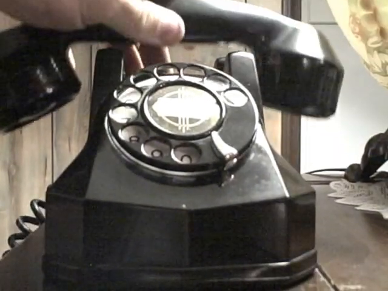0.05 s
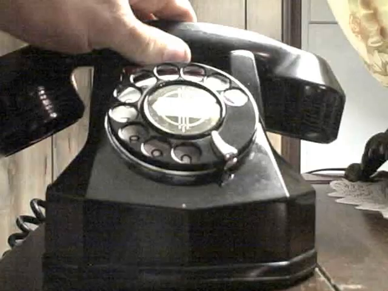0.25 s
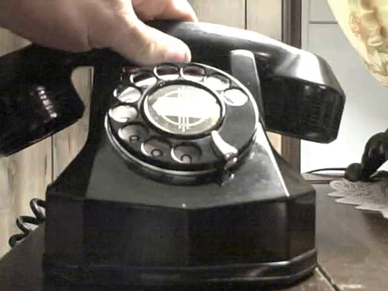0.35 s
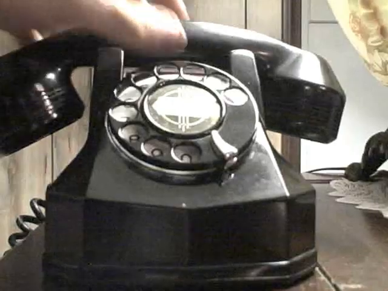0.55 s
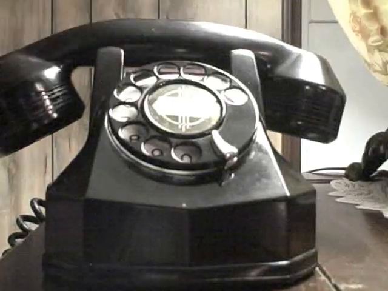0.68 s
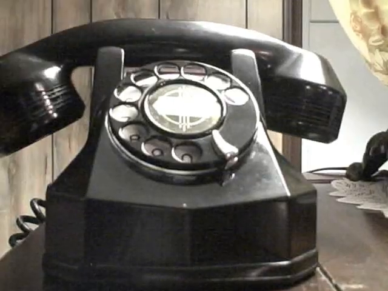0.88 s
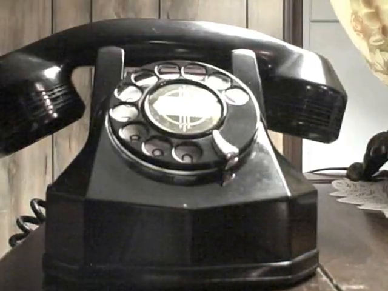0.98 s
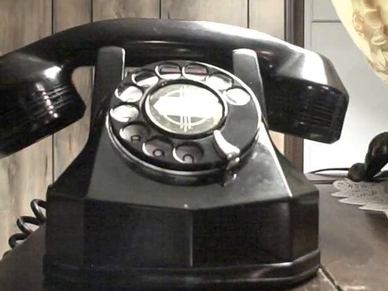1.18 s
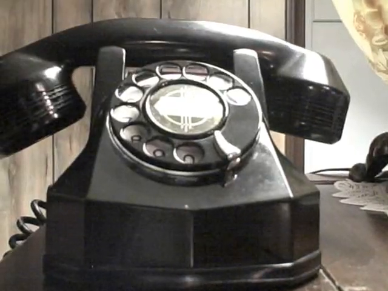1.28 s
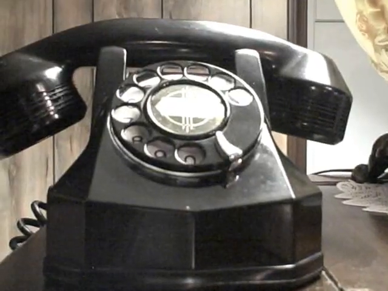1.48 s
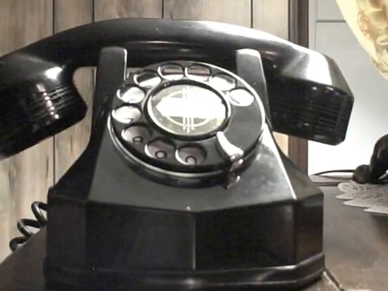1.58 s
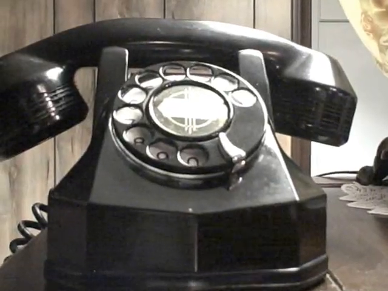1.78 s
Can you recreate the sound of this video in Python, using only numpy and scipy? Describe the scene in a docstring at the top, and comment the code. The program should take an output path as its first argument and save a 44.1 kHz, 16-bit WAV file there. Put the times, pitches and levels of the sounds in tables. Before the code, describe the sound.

A heavy plastic handset lands on a desk telephone, one end then the other, with a low desk thump and short rattle; then soft taps, thin ticks and cloth rustle in a quiet, hissy room, close microphone.

```python
"""A heavy plastic handset lands on a desk telephone: one end clacks, then the other, and it rocks to rest.
Each contact is a noise crack plus dying modes of shell, base and hollow; the desk booms, loose parts chatter.
Soft taps, thin ticks and cloth rustle (shaped noise) are heard in a quiet room with a noise-tail echo.
The camera adds rumble, hiss and two thin whines, and samples at a low rate that mirrors the treble."""
import sys
import numpy as np
from scipy import signal
from scipy.fft import rfft, irfft
from scipy.io import wavfile
from scipy.ndimage import uniform_filter1d

SR = 44100
rng = np.random.default_rng(int(sys.argv[2]) if len(sys.argv) > 2 else 0)


def output_pcm(signal):
    """Save a mono or channel-first signal as 16-bit PCM at the path in sys.argv[1].

    Samples are clipped to [-1, 1] before scaling.
    """
    pcm = np.clip(np.atleast_2d(signal).T, -1, 1) * 32767
    wavfile.write(sys.argv[1], SR, np.round(pcm).astype(np.int16))


def volts_from_db(level):
    """Convert decibel levels to linear amplitude ratios."""
    exponent = np.asarray(level, float) / 20
    return 10 ** exponent


N = 81585  # samples


def evened(x):
    """Normalisation by mean power: scales to rms 1."""
    return x / np.sqrt(np.mean(x ** 2) + 1e-20)


def read_spectrum(points, hz):
    """Interpolation on a log-frequency axis, which follows pitch, of a table over Hz."""
    f, value = np.transpose(points)
    return np.interp(np.log(hz + 1), np.log(f + 1), value)


def coloured(x, points):
    """Linear filtering: multiplies the spectrum of x by a table of dB over Hz."""
    gain = volts_from_db(read_spectrum(points, np.fft.rfftfreq(len(x), 1 / SR)))
    return irfft(rfft(x) * gain, len(x))


def level(curve):
    """Amplitude envelope: gain over time from straight lines in dB."""
    s, db = np.transpose(curve)
    return volts_from_db(np.interp(np.arange(N) / SR, s, db))


def add(mix, s, sound):
    """Superposition: adds a sound to the mix at time s."""
    part = mix[round(s * SR):][:len(sound)]
    part += sound[:len(part)]


def hiss(colour, lump_db, lump_s):
    """Amplitude-modulated noise: coloured noise whose level wanders by lump_db rms."""
    lumps = evened(uniform_filter1d(rng.standard_normal(N), max(round(lump_s * SR), 1)))
    noise = evened(coloured(rng.standard_normal(N), colour))
    return evened(noise * volts_from_db(lump_db * lumps))


def burst(colour, t60):
    """Exponential decay: a short dying puff of coloured noise."""
    t = np.arange(SR // 2) / SR
    return evened(coloured(rng.standard_normal(len(t)), colour)) * volts_from_db(-60 * t / t60)


# each contact point favours other modes (dB) and loads them a little (share of frequency)
SPOT_DB, SPOT_DETUNE = 2.5, 0.02
# heavy parts take longer to get moving
SHELL_RISE_S, BASE_RISE_S, DESK_RISE_S = 0.00015, 0.00047, 0.012


def ring(modes, rise_s, scatter=0):
    """Modal synthesis: a struck object sounds as the sum of its dying sines, one per mode."""
    hz, db, t60 = np.transpose(modes)[:, :, None]
    t = np.arange(SR // 2) / SR
    favour, load, coin = rng.standard_normal((3,) + hz.shape)
    # neighbours start opposed; scatter shifts a random half of them, 1 being half a turn
    start_turns = (scatter * (coin > 0) + np.arange(len(hz))[:, None]) / 2
    turns = hz * (1 + SPOT_DETUNE * load) * t + start_turns
    waves = volts_from_db(db + SPOT_DB * favour - 60 * t / t60) * np.sin(2 * np.pi * turns)
    return (1 - np.exp(-t / rise_s)) * waves.sum(0) / np.linalg.norm(volts_from_db(db))


# Cloth rustle over time. Each row: time in seconds, level in dB.
RUSTLE_LEVEL = [(0, -97.5), (.54, -82.5), (.575, -54.5), (.61, -86), (1.08, -70.5), (1.17, -58),
                (1.225, -64), (1.255, -53.5), (1.33, -57), (1.4, -68.5), (1.55, -73.5), (1.65, -67),
                (1.75, -63), (1.85, -57)]
# Rustle spectrum. Each row: frequency in Hz, relative density in dB.
RUSTLE_COLOUR = [(300, -23), (2000, -13.5), (4000, -13.5), (5200, -11.5), (6300, -0.5), (7900, -8.5)]


def rustle():
    """Friction noise: cloth heard as bright noise with quick lumps."""
    return level(RUSTLE_LEVEL) * hiss(RUSTLE_COLOUR, lump_db=2.3, lump_s=0.0078)


# Low stir in the room over time. Each row: time in seconds, level in dB.
STIR_LEVEL = [(0, -82), (.9, -75.5), (1.25, -67), (1.45, -73), (1.62, -64), (1.72, -71), (1.85, -68)]
# Stir spectrum. Each row: frequency in Hz, relative density in dB.
STIR_COLOUR = [(100, -11.5), (300, -2), (550, -7.5), (1100, -4), (1600, -16), (3000, -28)]


def stir():
    """Band-shaped noise: a dull stir in the room with slower lumps."""
    return level(STIR_LEVEL) * hiss(STIR_COLOUR, lump_db=2.5, lump_s=0.04)


# Room rumble and camera hiss. Each row: frequency in Hz, relative density in dB.
FLOOR_COLOUR = [(15, -17.5), (45, -2), (65, -7), (90, -15), (250, -21.5), (550, -25), (800, -37),
                (2000, -39.5), (4000, -40.5), (6300, -36.5), (7200, -33), (7900, -46.5)]
FLOOR_DB = -55


def noise_floor():
    """Stationary noise: steady rumble and hiss, plus a low rumble that wanders in level."""
    steady = volts_from_db(FLOOR_DB) * hiss(FLOOR_COLOUR, lump_db=0, lump_s=0.01)
    low_colour = FLOOR_COLOUR[:4] + [(200, -58)]
    return steady + volts_from_db(FLOOR_DB - 5.5) * hiss(low_colour, lump_db=-2, lump_s=0.06)


# Motor whine, in two stretches. Each row: time in seconds, frequency in Hz, rms level in dB.
MOTOR = [
    [(0.0, 2050, -66), (0.04, 2050, -68.5), (0.22, 2046, -64)],
    [(0.4, 2052, -64.5), (0.504, 2050, -70), (0.86, 2048, -66), (0.956, 2050, -76.5), (1.252, 2045, -69),
     (1.506, 2050, -79), (1.676, 2044, -71), (1.85, 2044, -70.5)],
]


def motor_whine():
    """Frequency modulation: the phase is the running sum of a wavering frequency."""
    t = np.arange(N) / SR
    s, hz, db = np.vstack(MOTOR).T
    turns = np.cumsum(np.interp(t, s, hz)) / SR
    return np.sqrt(2) * volts_from_db(np.interp(t, s, db)) * np.sin(2 * np.pi * turns)


SCAN_HZ, SCAN_DB = 7627, -66  # high tone between its dips
FRAME_HZ, FIRST_DIP_S, DIP_S = 58.35, 0.011, 0.0008
DIP_TURNS, DIP_DB = 0.5, 5  # phase lost in each dip, and the swell during it
BLUR_S, BLUR_TURNS = (1.625, 1.71), 0.4  # the high tone briefly turns fuzzy


def scan_whine():
    """Phase modulation: a high tone loses phase in each frame, so its pitch dips briefly."""
    t = np.arange(N) / SR
    frames = (t - FIRST_DIP_S) * FRAME_HZ
    dip_share = DIP_S * FRAME_HZ
    lost = DIP_TURNS * (np.floor(frames) + np.minimum(frames % 1 / dip_share, 1))
    jitter = evened(uniform_filter1d(rng.standard_normal(N), size=120))
    blur = (t > BLUR_S[0]) * (t < BLUR_S[1]) * jitter
    gain = np.sqrt(2) * volts_from_db(SCAN_DB + DIP_DB * (frames % 1 < dip_share))
    return gain * np.sin(2 * np.pi * (SCAN_HZ * t - lost + BLUR_TURNS * blur))


# Taps as the phone is brushed or settles. Each row: start in seconds, then knock, base and shell level in dB.
TAPS = [(0.1448, -49, -39.5, -72), (0.4724, -40.5, -43, -56.5), (0.4763, -64, -55, -61),
        (0.483, -48, -41.5, -63), (.5530, -51, -46, -67), (1.239, -53, -55, -65)]
# Modes of the knock. Each row: frequency in Hz, relative level in dB, t60 in seconds.
KNOCK_RING = [(380.6, -0.5, 0.08), (900, -1, .03), (599.7, -6, 0.013)]
# Noise of the knock. Each row: frequency in Hz, relative density in dB.
KNOCK_COLOUR = [(100, -13.5), (400, -0.5), (850, -5), (1200, -15), (3000, -19), (4500, -36), (8000, -52)]
# Modes of the phone's base. Each row: frequency in Hz, relative level in dB, t60 in seconds.
BASE = [(104.56, -8, .06), (161.6, -1.5, 0.081), (244, -8.5, .12), (310, -10.5, .05), (382.4, -9, .05),
        (431, -9, .055), (525, -3, .05), (1170, -9, .025), (1779, -2.5, 0.04)]
# Modes of the plastic shell. Each row: frequency in Hz, relative level in dB, t60 in seconds.
SHELL = [(813, -12, 0.03), (1152, -13.5, 0.039), (1555, -16.5, 0.032), (1750, -7, 0.028),
         (2674, -16.5, 0.17), (2800, -16, .15), (3173, -4, 0.025), (3947, -10.5, .02), (4560, -4.5, 0.024),
         (5090, -8, 0.018), (5812, 0.5, 0.018), (6290, -5, 0.031), (6960, -4.5, 0.018), (7330, 1.5, 0.019)]


def soft_taps():
    """Soft excitation: a gentle blow wakes only the lowest modes of base and shell."""
    out = np.zeros(N)
    for s, knock_db, base_db, shell_db in TAPS:
        knock = ring(KNOCK_RING, BASE_RISE_S) + volts_from_db(-5.5) * burst(KNOCK_COLOUR, t60=0.046)
        base = ring(BASE[:4], BASE_RISE_S)
        shell = ring(SHELL[:7], BASE_RISE_S, scatter=1)
        add(out, s, volts_from_db(knock_db) * knock + volts_from_db(base_db) * base + volts_from_db(shell_db) * shell)
    return out


# Decay of the room. Each row: frequency in Hz, t60 in seconds.
ROOM_T60 = [(100, 0.24), (500, 0.41), (1500, 0.23), (4000, 0.27), (7500, 0.2)]


def room(x):
    """Reverberation: convolution with a noise tail whose bands die at their own speeds."""
    hz, t, z = signal.stft(rng.standard_normal(SR // 2), SR, nperseg=256)
    decay = volts_from_db(-60 * t / read_spectrum(ROOM_T60, hz)[:, None])
    tail = signal.istft(z * decay, SR, nperseg=256)[1]
    tail *= np.minimum(np.arange(len(tail)) / SR / 0.01, 1)  # builds up over 10 ms
    return signal.fftconvolve(x, tail / np.linalg.norm(tail))[:N]


# The desk takes a load and booms. Each row: start in seconds, level in dB.
THUMPS = [(0.146, -38.5), (.2748, -38), (0.3195, -19.5), (0.555, -50), (1.252, -37)]
# Modes of the desk. Each row: frequency in Hz, relative level in dB, t60 in seconds.
DESK = [(48.5, -2, 0.3), (73.5, -13.5, .2), (30, -5.5, 0.22)]


def desk_thumps():
    """Inertia: the heavy desk answers a load with slow-rising low modes."""
    out = np.zeros(N)
    for s, db in THUMPS:
        add(out, s, volts_from_db(db) * ring(DESK, DESK_RISE_S))
    return out


# Contacts of handset and cradle. Each row: start in seconds, then shell, base and hollow level in dB.
CONTACTS = [(0.2372, -7.5, -41.5, -48), (0.2390, -10.5, -43.5, -47.5), (.2408, -6, -41.5, -46),
            (.2430, -14, -46, -51), (0.248, -25.5, -53, -58.5), (0.27, -19, -29.5, -39.5),
            (0.2721, -18.5, -29.5, -37.5), (0.2751, -10.5, -3.5, -26), (0.2774, -9.5, -14, -29.5),
            (0.281, -4.5, -14, -32), (0.2859, -12.5, -30, -32.5), (0.288, -18.5, -30, -35),
            (0.2951, -21.5, -20, -17.5), (0.302, -29.5, -17.5, -30.5), (0.3202, -24, -21, -23.5),
            (.3240, -31.5, -31, -19.5), (.3290, -29.5, -23.5, -35.5)]
# Modes of the hollow. Each row: frequency in Hz, relative level in dB, t60 in seconds.
HOLLOW = [(613.2, 1, 0.077), (540.5, -7, .07), (676, -10, 0.095), (855, -16.5, 0.058)]
# Noise of a hard contact. Each row: frequency in Hz, relative density in dB.
CRACK_COLOUR = [(200, -49), (400, -30), (900, -14.5), (1730, -7), (3160, -2.5), (4200, -7.5), (5930, 1),
                (7900, -4)]


def handset_contacts():
    """Impact excitation: every hard contact cracks and rings shell, base and hollow together."""
    out = np.zeros(N)
    for s, shell_db, base_db, hollow_db in CONTACTS:
        shell = ring(SHELL, SHELL_RISE_S, scatter=0.73)
        crack = volts_from_db(3) * burst(CRACK_COLOUR, t60=0.011)
        base = ring(BASE, BASE_RISE_S)
        hollow = ring(HOLLOW, BASE_RISE_S)
        add(out, s, volts_from_db(shell_db) * (shell + crack) + volts_from_db(base_db) * base + volts_from_db(hollow_db) * hollow)
    return out


RATTLE_S, RATTLE_LENGTH_S = 0.284, 0.16  # after the second end lands
RATTLE_DB, RATTLE_T60_S, RATTLE_SPREAD_DB = -26.5, 0.22, 4


def loose_parts():
    """Random impulse train: loose parts chatter in fifty small cracks that weaken with time."""
    out = np.zeros(N)
    for late, size in rng.random(size=(50, 2)):
        after_s = late * RATTLE_LENGTH_S
        db = RATTLE_DB - 60 * after_s / RATTLE_T60_S + RATTLE_SPREAD_DB * (2 * size - 1)
        add(out, RATTLE_S + after_s, volts_from_db(db) * burst(CRACK_COLOUR, t60=0.008))
    return out


# A cluster of thin ticks away from the phone. Each row: start in seconds, level in dB.
TICKS = [(1.2242, -27), (1.2268, -37), (1.230, -40), (1.2342, -38), (1.237, -31.5), (1.239, -42)]
# Modes of a tick. Each row: frequency in Hz, relative level in dB, t60 in seconds.
TICK_RING = [(6370, -1.5, 0.0062), (5360, -13, 0.0048), (7260, -10.5, 0.006), (1690, -19, 0.0047)]


def ticks():
    """Strong damping: tiny hard clicks whose bright modes die within milliseconds."""
    out = np.zeros(N)
    for s, db in TICKS:
        tone = ring(TICK_RING, SHELL_RISE_S)
        snap = volts_from_db(-13) * burst(CRACK_COLOUR, t60=0.005)
        add(out, s, volts_from_db(db) * (tone + snap))
    return out


def scene():
    """Superposition: hits and their room tail over rustle, stir, floor and whines."""
    hits = handset_contacts() + soft_taps() + desk_thumps() + loose_parts() + ticks()
    background = rustle() + stir() + noise_floor()
    echo = volts_from_db(-18.5) * room(hits)
    return (hits + echo + background + motor_whine() + scan_whine())[None]


def band_limit(x):
    """A steep low-pass at the top of the band."""
    return signal.sosfilt(signal.butter(12, 10320, fs=SR, output="sos"), x)


# Soft filter after the sampling. Each row: frequency in Hz, gain in dB.
SMOOTHING = [(6000, -1.5), (7600, -2), (8400, -8), (9200, -19), (10000, -38.5), (10600, -65), (12000, -80)]
CAMERA_RATE_HZ = 16000
OVERLOAD = 1.3  # amplitude limit of the soft overload


def record(dry):
    """Spectral imaging: low-rate sampling mirrors the band below half the rate; a filter leaves part of it."""
    squeezed = OVERLOAD * np.tanh(dry[0] / OVERLOAD)
    lowpass = signal.minimum_phase(signal.firwin(401, CAMERA_RATE_HZ / 2, fs=SR))
    band = signal.oaconvolve(squeezed, lowpass)[:N]
    # a carrier at the camera's rate makes the mirror image
    mirrored = band * (1 + 2 * np.cos(2 * np.pi * CAMERA_RATE_HZ * np.arange(N) / SR))
    dither = volts_from_db(-94) * rng.standard_normal(N)
    mix = coloured(mirrored, SMOOTHING) + dither
    return band_limit(mix[None])


dry = scene()
out = record(dry)
output_pcm(out)
```